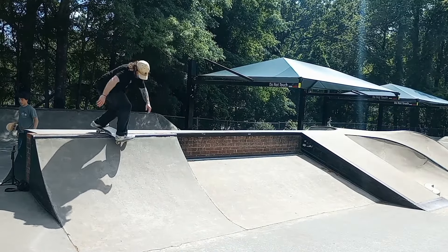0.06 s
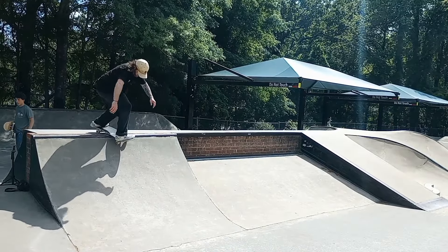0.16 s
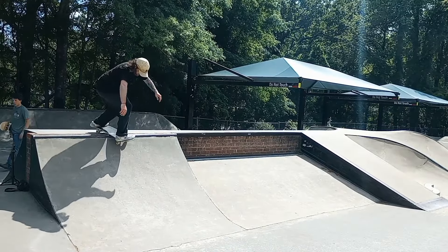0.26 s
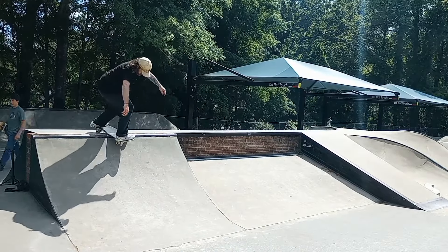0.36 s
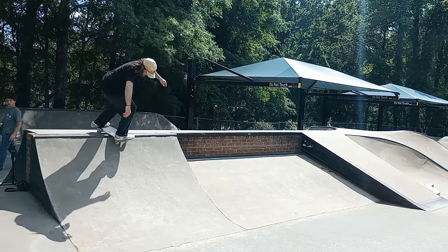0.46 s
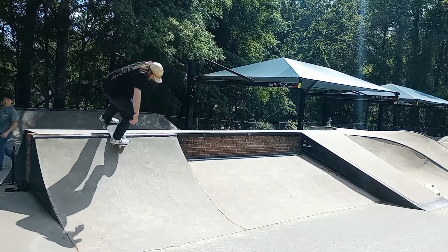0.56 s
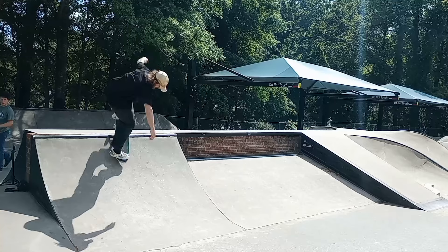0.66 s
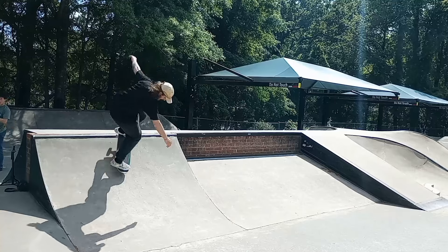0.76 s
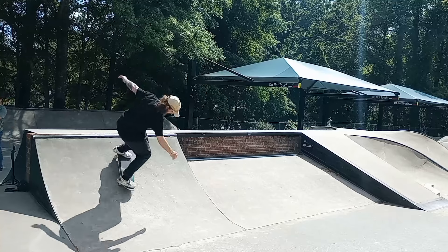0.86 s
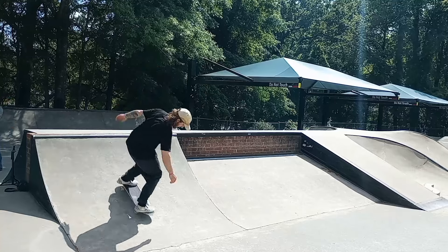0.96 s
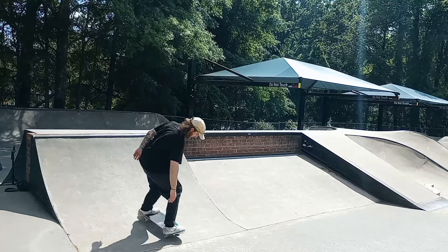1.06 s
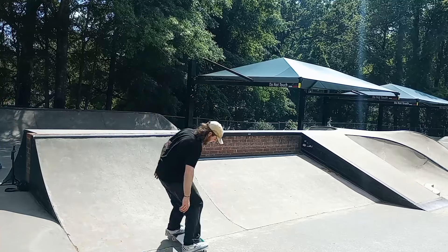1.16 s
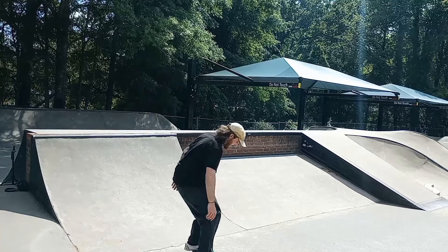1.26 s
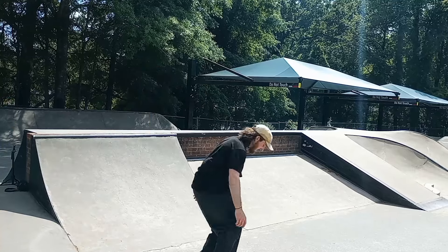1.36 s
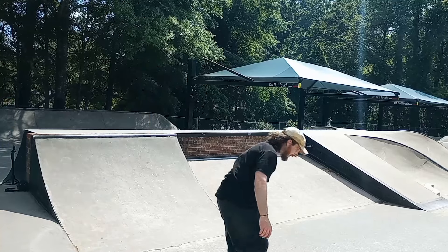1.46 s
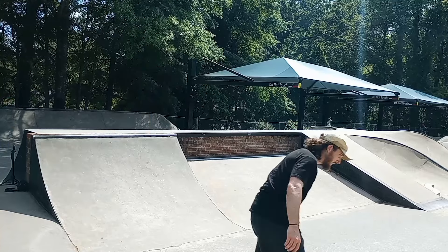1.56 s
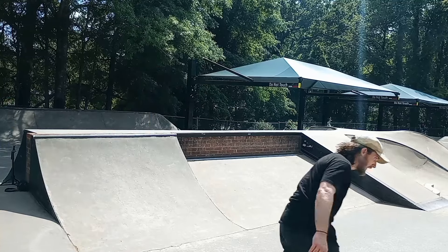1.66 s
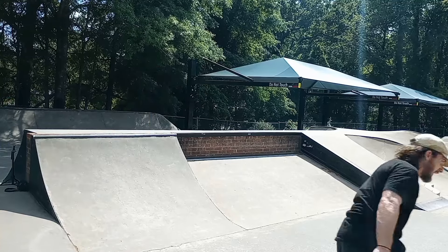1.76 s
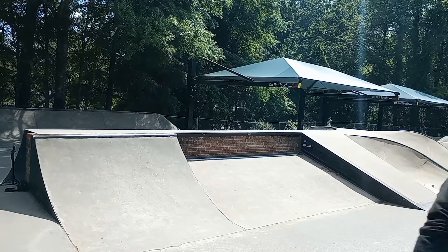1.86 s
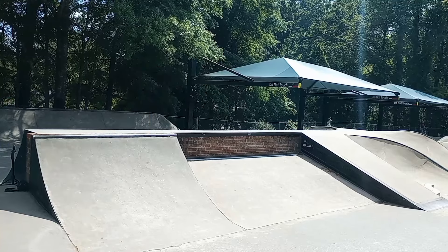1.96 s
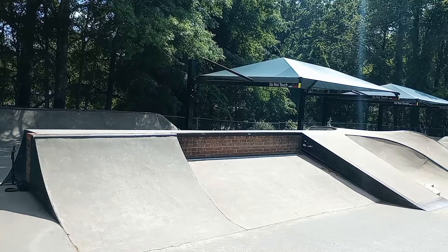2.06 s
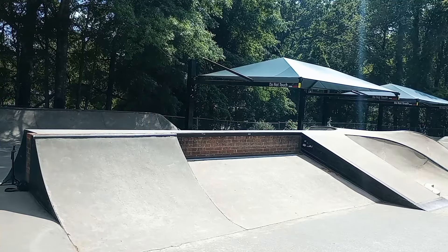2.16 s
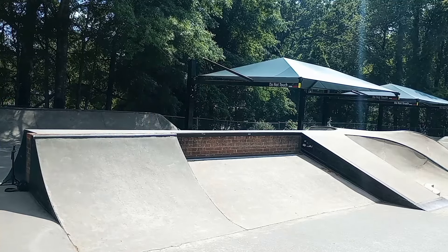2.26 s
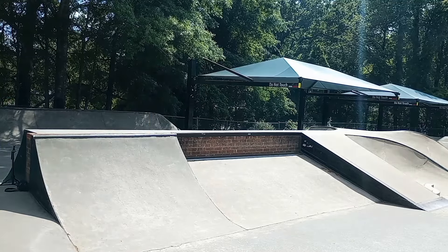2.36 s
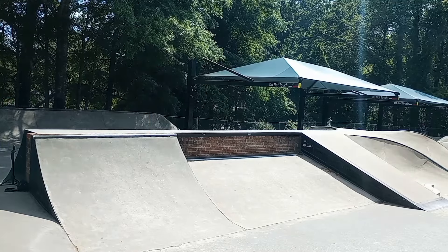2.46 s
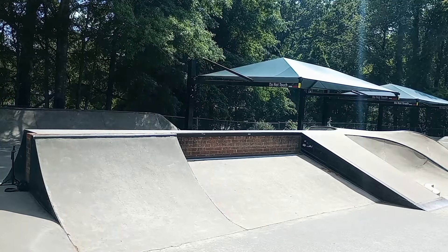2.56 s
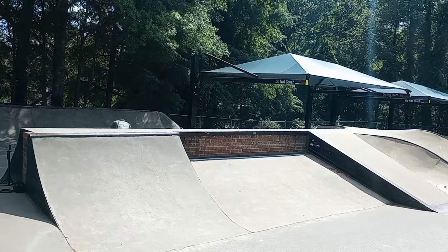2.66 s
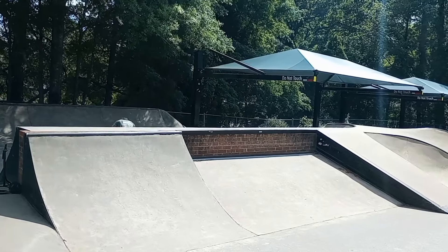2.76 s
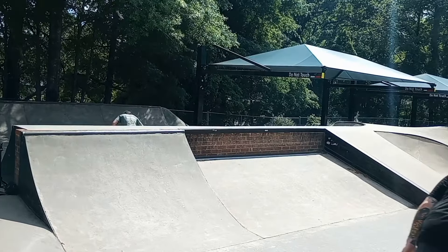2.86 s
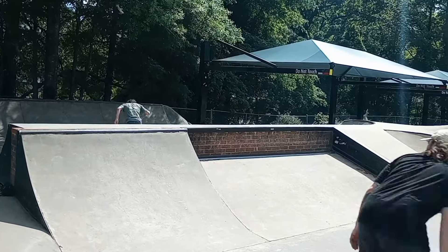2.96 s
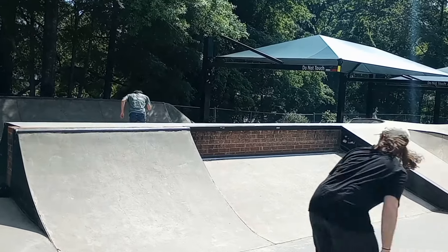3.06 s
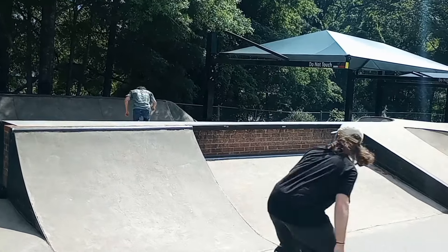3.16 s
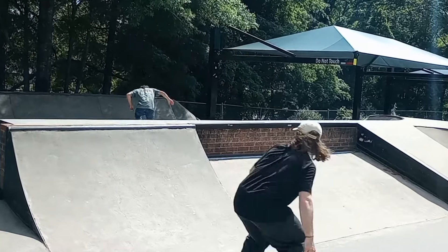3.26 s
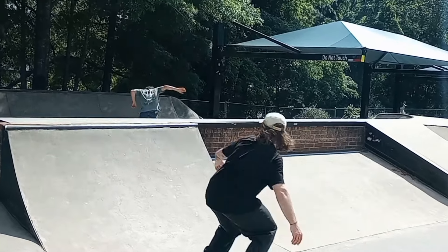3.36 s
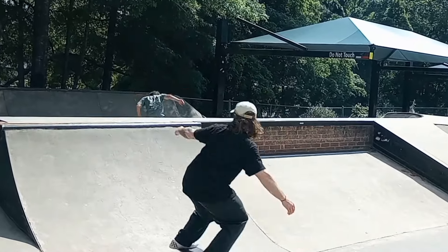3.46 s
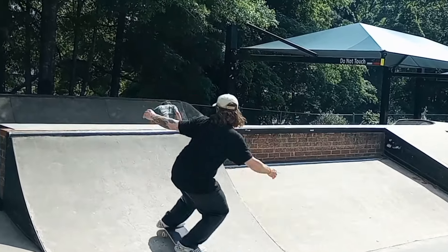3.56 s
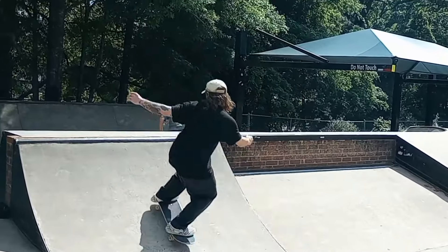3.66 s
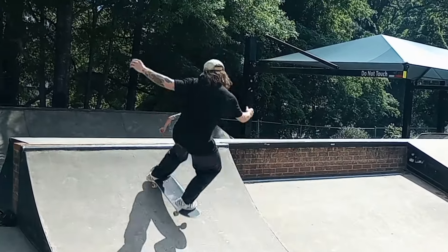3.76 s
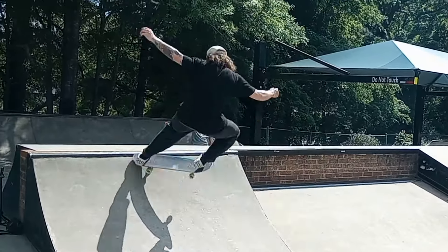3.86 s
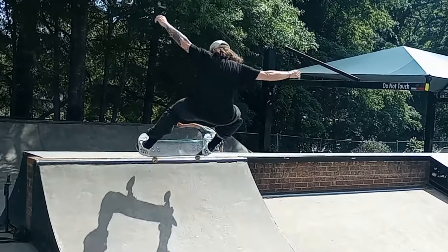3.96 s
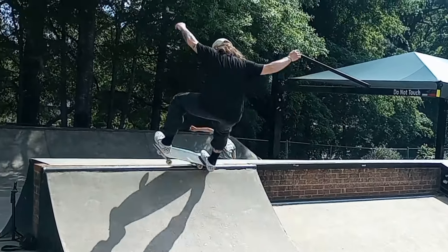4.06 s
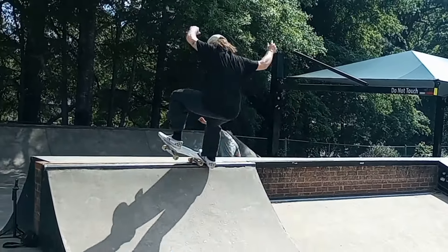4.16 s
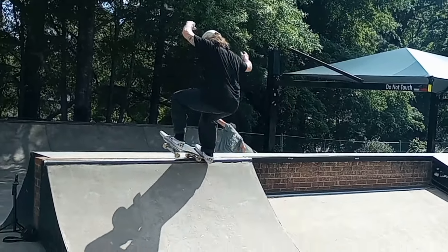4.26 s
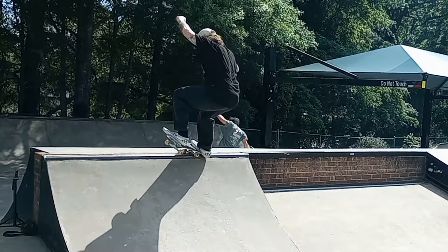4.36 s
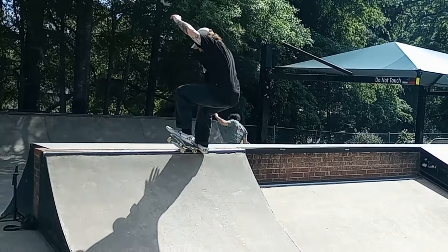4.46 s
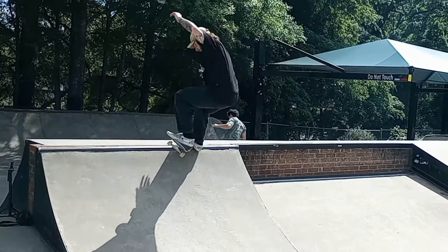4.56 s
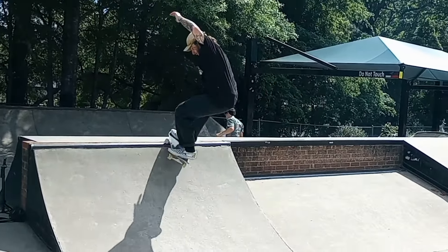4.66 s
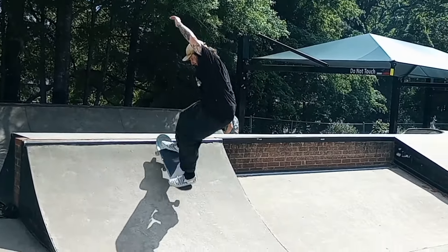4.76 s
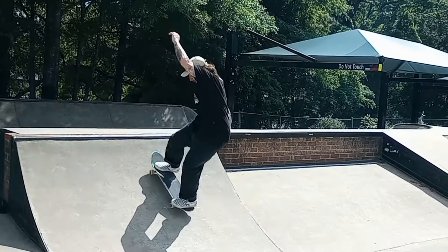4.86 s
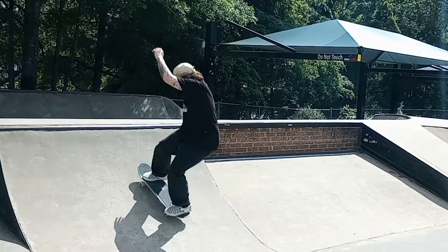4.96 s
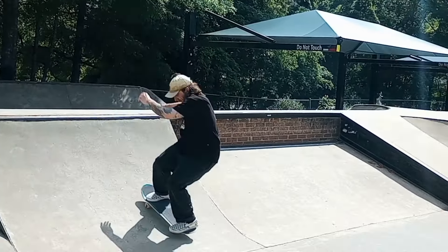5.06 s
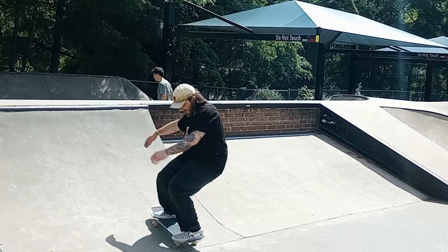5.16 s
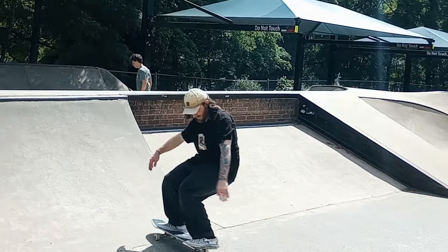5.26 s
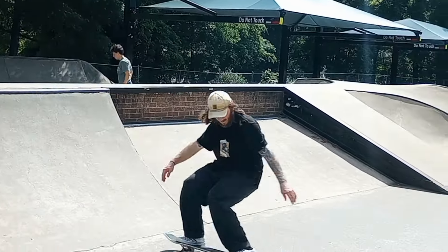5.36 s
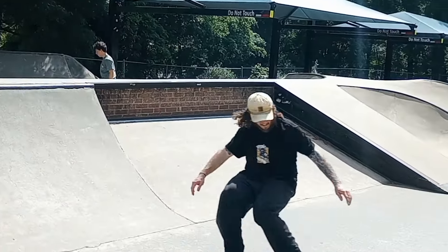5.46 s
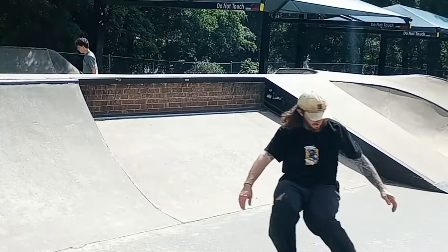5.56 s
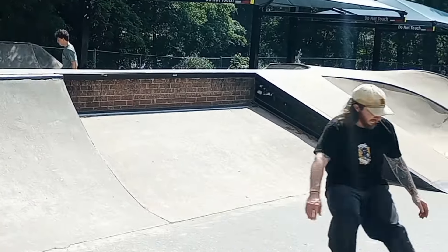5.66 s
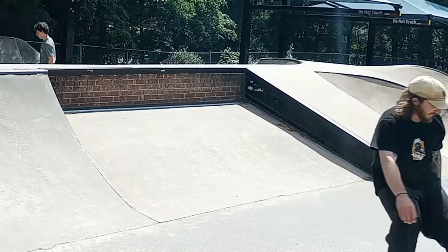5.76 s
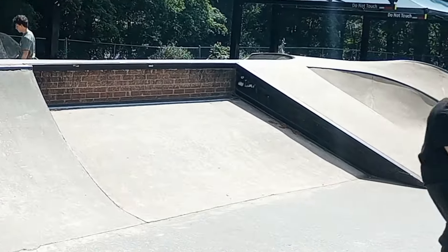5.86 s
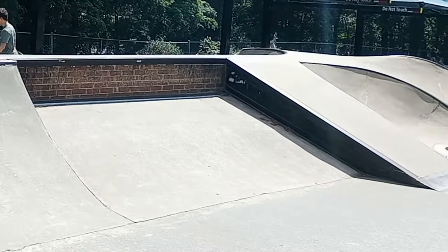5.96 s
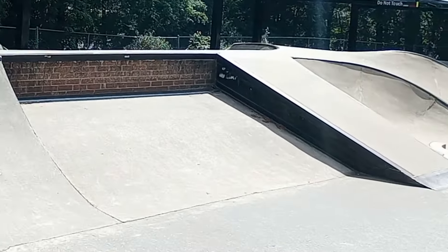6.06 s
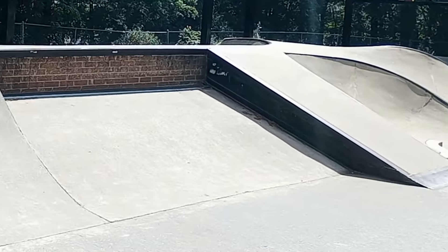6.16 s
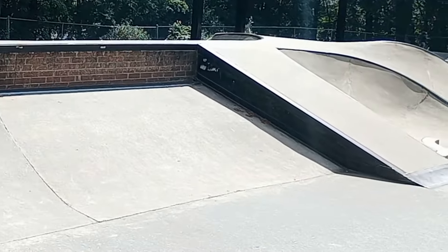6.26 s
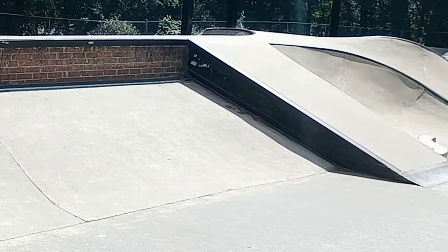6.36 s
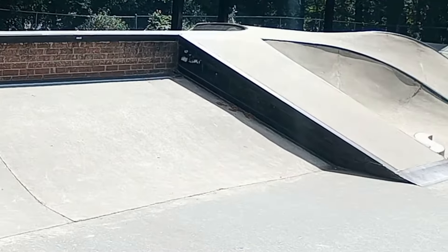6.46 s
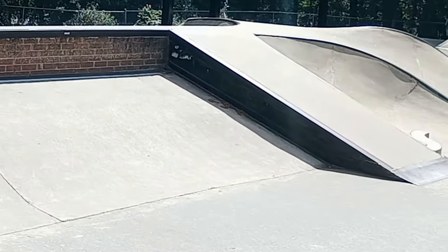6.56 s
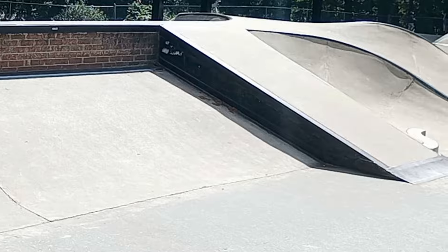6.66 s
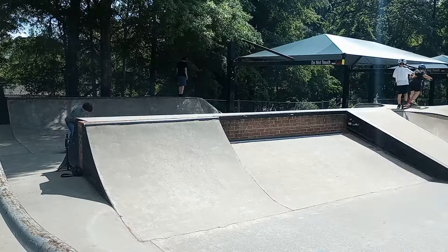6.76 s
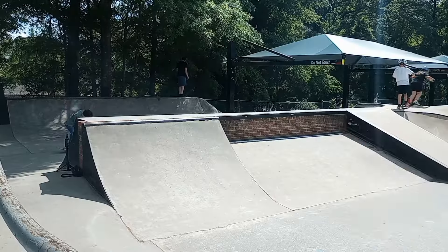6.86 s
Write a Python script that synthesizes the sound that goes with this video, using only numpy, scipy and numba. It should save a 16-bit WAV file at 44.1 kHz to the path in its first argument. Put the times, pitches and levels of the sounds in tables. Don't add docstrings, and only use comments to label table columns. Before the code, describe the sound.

Hard wheels rumble and hiss over gritty concrete, broken by sharp wood-and-steel clacks at a ramp's edge, ending in a sudden skid.

```python
import sys
import numpy as np
from scipy import signal
from scipy.fft import rfft, irfft
from scipy.io import wavfile
from scipy.ndimage import uniform_filter1d, map_coordinates
from numba import njit

SR = 44100
rng = np.random.default_rng(int(sys.argv[2]) if len(sys.argv) > 2 else 0)


def put_to_file(sound):
    columns = np.atleast_2d(sound).T
    safe = np.clip(columns, -1, 1)
    whole_steps = np.round(safe * 32767)
    wavfile.write(sys.argv[1], SR, whole_steps.astype(np.int16))


def decibels_to_gain(level_db):
    exponent = np.asarray(level_db, float) / 20
    return 10 ** exponent


N = 305172
T = np.arange(N) / SR

# frequency in Hz, density in dB per Hz.
PARK_SPECTRUM = [(15, -48), (30, -13.5), (123, 3.5), (277, -13), (326, -14), (607, -8), (1790, -15.5),
                 (2760, -12), (3520, -24.5), (4140, -19.5)]
PARK_SPECTRUM += [(8140, -34), (12100, -37), (13600, -41), (14900, -32), (15500, -33), (16500, -50)]
# frequency in Hz, correlation from 0 to 1.
PARK_LIKENESS = [(60, 0.98), (290, 0.91), (640, 0.27), (1400, 0.15), (16000, 0.022)]
# time in seconds, level in dB, width in seconds.
GUSTS = [
    (.83, -51, 0.018),
    (1.22, -57, 0.038),
    (1.55, -58, 0.12),
    (2.3, -62, 0.12),
    (2.45, -60, 0.046),
    (3.1, -49.5, 0.043),
    (3.9, -59, 0.076),
    (4.67, -53, 0.063),
    (6.2, -59, 0.04),
]
# time in seconds, width in seconds.
DIPS = [
    (2.552, 0.004),
    (6.656, 0.0028),
]
# time in seconds, lag in milliseconds.
PORT_LAG_MS = [(0, 0.093), (.7, -0.21), (1.2, -0.075), (1.75, -0.022), (2.3, 0.34), (2.6, 0.29),
               (3.2, -0.0049), (3.8, -0.16), (4.8, -0.14), (5.3, -0.076), (6.3, 0.088), (6.65, 0.084),
               (6.7, 0.27), (6.92, 0.31)]
# time in seconds, left minus right in dB.
ROLL_PAN_DB = [(0.0, -8), (0.42, -6), (0.46, 0.5), (1.56, 2.5), (2.37, -4.5), (3.1, 6.5), (4.49, -3),
               (4.61, 3), (4.72, 2.5), (6.63, -1), (6.73, -4), (6.92, -2.5)]
# middle in seconds, half length in seconds, resonance in Hz,
# its width in Hz, level in dB.
SCUFFS = [(0.447, .02, 2660, 700, -61), (0.765, 0.027, 2550, 520, -48), (.765, .025, 1900, 420, -50),
          (2.25, 0.05, 1450, 200, -47), (3.39, 0.05, 3500, 2400, -58), (3.38, .035, 2200, 300, -62),
          (3.24, .06, 2650, 1200, -62), (3.03, .035, 6200, 2000, -50), (3.03, .03, 4000, 1000, -54),
          (1.03, .13, 6050, 1300, -48), (1.95, .07, 5500, 1200, -52), (3.742, .012, 2000, 700, -51),
          (4.29, 0.018, 2500, 2200, -53), (4.275, .03, 1500, 600, -56), (1.74, .07, 5600, 2600, -54),
          (4.17, .03, 4200, 900, -52), (4.185, .015, 600, 900, -50), (4.245, .015, 4200, 2000, -58),
          (5.48, .16, 400, 260, -42), (6.35, .03, 1660, 200, -60), (1.42, .17, 160, 380, -54),
          (2.075, .055, 4400, 3600, -43), (2.25, .1, 4400, 700, -58), (5.52, 0.19, 5900, 1340, -57),
          (6.3, 0.03, 3600, 2400, -58), (6.595, .04, 720, 300, -48), (3.72, .08, 880, 500, -47),
          (5.53, .07, 1620, 300, -50), (5.8, .08, 1150, 500, -57), (6.47, .025, 850, 300, -53),
          (6.39, .03, 970, 250, -56), (4.66, .045, 880, 600, -54), (3.568, 0.065, 1004, 397, -42),
          (5.47, .025, 1030, 300, -48), (6.344, 0.02, 2090, 1300, -58), (3.89, .04, 2200, 800, -59),
          (5.91, .06, 2050, 900, -63), (1.8, .17, 1500, 1500, -48), (6.795, .025, 8010, 250, -57),
          (2.345, .04, 1420, 110, -46.5), ]
# peak in seconds, level in dB, rise in seconds,
# fall in seconds, fineness in dB.
SKIDS = [
    (.42, -61.5, 0.12, 1, -15),
    (0.777, -40, 0.038, 0.011, -21),
    (2.031, -36, 0.018, 0.1, 0.5),
    (4.68, -51.5, 0.032, 0.099, -13),
    (6.666, -40, .006, 0.12, -16),
    (6.773, -34, 0.013, 0.54, -10),
]
# time in seconds, level in dB, left minus right in dB.
PEBBLES = [(0.722, -45, -17), (.938, -34, 8), (1.149, -27.5, 8), (1.39, -42, 1), (1.438, -33, 10),
           (1.491, -41, -2), (1.612, -29.5, -4), (1.6877, -33, -1), (1.7182, -30, -4), (1.8917, -40, 0),
           (4.196, -52, 0), (2.573, -39, 8.5), (2.7535, -35, 8), (2.879, -34.5, 9), (3.002, -35, 5),
           (3.514, -30, 5), (1.471, -30.5, 4), (1.518, -36, 9), (1.5445, -52, 0), (1.635, -27, 3),
           (2.121, -32, -7), (2.264, -39.5, -16), (2.2945, -39, -15), (3.7497, -32.5, 12),
           (4.2737, -64, -15), (6.2955, -44, 9), (6.3435, -54, -3), (3.399, -59, -13), (6.771, -18, -12.5)]
# frequency in Hz, width in Hz, level in dB.
STEEL_MODES = [(2200, 2200, -4), (3900, 2400, -13), (6050, 2400, -12)]
# time in seconds, thud in dB, ring in Hz, crack in dB,
# left minus right of the crack in dB.
SLAMS = [(0.581, -25, 987, -30.5, 12), (0.5838, -18, 342, -15.5, 4.5), (.584, -35, 1740, -49, 2),
         (0.603, -34, 820, -33, -5), (.8152, -0.5, 795, -24, 12), (0.8208, 3.5, 798, -16, 6),
         (.8205, -7.5, 1530, -40, 0), (0.8195, -11, 2360, -43, 0), (.8245, -29, 700, -57, 2),
         (.830, -24, 655, -35, 0), (4.073, -26.5, 815, -17, 9.5), (4.08, -17.5, 812, -10.5, -10.5),
         (4.079, -23, 2300, -47, -3), (4.1155, 2, 2300, -45, 0), (4.098, -29, 960, -22, 3),
         (4.11, -18.5, 323, -25, 11), (4.116, -35.5, 594, -17, 2), (4.172, -49, 393, -41, -18),
         (4.218, -61, 905, -45, -2), (4.618, -54, 875, -42, 5), (4.62, -45, 2120, -62, -2),
         (4.692, -26.5, 238, -29, 14), (4.694, -28.5, 1484, -40, -13), (4.703, -55, 854, -51, -21),
         (4.828, -17.5, 983, -19, -1), (4.840, -31, 720, -13, -2), (4.844, 4.5, 740, -29, 10),
         (4.849, -21, 790, -23, 22), (4.853, -8, 726, -18, -1), (4.857, -8, 690, -27, -6),
         (4.861, -40, 720, -22.5, -3), (4.866, -9, 730, -24, -1), (4.872, -17, 294, -31, 15)]
# time in seconds, thud in dB, ring in Hz, crack in dB.
JOINTS = [(0.495, -54, 200, -43), (0.905, -25, 307, -35), (1.155, -29, 456, -54), (1.214, -25.5, 610, -62),
          (1.224, -17.5, 323, -40), (1.225, -34, 775, -43), (1.225, -28, 1426, -50), (1.613, -34, 380, -35),
          (1.713, -48, 770, -40), (2.659, -18, 580, -32.5), (2.725, -22, 577, -42), (2.767, -44, 570, -45),
          (3.433, -24, 211, -36.5), (3.443, -40, 580, -33.5), (3.453, -15.5, 684, -34),
          (3.652, -20.5, 547, -55), (5.029, -29, 332, -36), (5.207, -20.5, 270, -46),
          (5.21, -32.5, 765, -58), (5.293, -21.5, 775, -31), (5.295, -27, 248, -60), (6.451, -53, 812, -52),
          (6.548, -42, 730, -60), (6.657, -28, 1820, -37), (6.664, -37, 654, -38)]
# time in seconds,
# thud in dB, ring in Hz.
JOLTS = [(0.895, -17, 323), (0.93, -12, 300), (0.968, -20, 573), (1.015, -13, 280), (1.36, -50, 1100),
         (1.435, -35, 1032), (1.586, -34, 710), (1.685, -30.5, 374), (1.745, -16, 780), (1.79, -21, 590),
         (1.897, -23, 402), (1.913, -17, 468), (1.973, -12.5, 647), (2.007, -30, 660), (2.036, -21, 690),
         (2.14, -23, 610), (2.26, -31.5, 880), (2.693, -18, 584), (2.744, -8.5, 546), (2.865, -32, 589),
         (3.002, -23.5, 698), (3.066, -27, 773), (3.155, -42, 620), (3.305, -33, 642), (3.348, -42, 637),
         (3.399, -37, 256), (3.512, -20.5, 550), (4.953, -30, 370), (4.981, -26, 347), (5.356, -24, 574),
         (5.47, -25, 630), (5.541, -23.5, 414), (5.577, -29, 630), (5.627, -36, 457), (5.702, -45, 314),
         (5.777, -34, 363), (6.272, -47, 492), (6.416, -45, 550), (6.574, -49, 730), (6.829, -43, 490),
         (6.856, -24.5, 580), (6.897, -27, 550),
         (.5893, -18, 350), (.587, -33, 1015), (.591, -27, 1720), (.626, -47, 350), (.8215, -8, 3850),
            (.833, -21, 278), (1.62, -35, 163), (1.708, -26, 159), (1.714, -28, 1200), (1.764, -30, 764),
            (1.797, -21, 164), (1.807, -19, 610), (1.819, -9.5, 660), (1.845, -33, 375), (1.922, -31, 159),
            (2.053, -16.5, 690), (2.162, -28, 560), (2.205, -43, 149), (2.232, -41, 880),
            (4.081, -14, 5900), (4.112, -19, 866), (4.117, -19, 6000), (4.2745, -32, 2640),
            (4.298, -51, 2630), (5.051, -24, 320), (5.07, -25, 322), (5.035, -33, 810), (5.155, -39, 580),
            (5.41, -21, 647), (6.551, -50, 770), (.797, -45, 750), (4.074, -24, 2040), (4.076, -26, 3580),
            (6.658, -34, 1486), (6.770, -21, 3320), (6.772, -36, 1780), (4.694, -41, 400),
            (4.842, -8, 1100), (4.845, -17, 428), (4.0833, -34, 1510), (4.118, -18, 2930)]
# frequency in Hz, density in dB per Hz.
GRIT_SPECTRUM = [(1350, -20), (2300, -6.5), (2660, -7), (3310, -2), (4770, -5.5), (5570, -3), (6040, -3),
                 (6880, -6)]
GRIT_SPECTRUM += [(7600, -5), (10000, -4), (12800, -8), (13500, -7), (15100, 3), (15500, 2), (16500, -20)]
# start in seconds, wheel ring in Hz, its glide in Hz per second,
# deck ring in Hz, truck ring in Hz.
SURFACES = [(0, 670, 50, 198, 1590), (.85, 639, -44, 318, 1018), (1.3, 980, -150, 410, 1120),
            (1.6, 738, -200, 369, 1166), (1.841, 450, 1400, 330, 1190), (2.019, 622, 128, 306, 1230),
            (2.555, 640, -280, 323, 1555), (2.869, 672, -77, 293, 840), (3.45, 596, -5, 278, 890),
            (4.0, 840, 8, 280, 1520), (4.88, 760, -600, 393, 1164), (5.2, 610, 0, 302, 890),
            (5.28, 664, -640, 346, 1574), (5.95, 520, 100, 247, 1220), (6.25, 565, 699, 279, 1260),
            (6.66, 580, 0, 298, 1720)]
# time in seconds, wheel level in dB, then deck flex and grit in dB against the wheels.
DROP_IN = [(.5, -75.5, 10, 8), (.84, -58, -10, -20), (.852, -52, 6, -9), (0.916, -33, -4, -10),
           (1.024, -30.5, 2.5, -6.5), (1.268, -46.5, 2, -1), (1.388, -52.5, -9.5, 7)]
PASS_BY = [(1.589, -45.5, -6.5, 0.5), (1.64, -37.5, 1, -4.5), (1.802, -29, -11.5, -15.5),
           (1.854, -32, -5, -15), (2.015, -32, -20, -20.5), (2.097, -36, -8, -13),
           (2.231, -40.5, -15.5, -12.5), (2.335, -55, -1, 2), (2.545, -69.5, 10, 7)]
RETURN = [(2.555, -51, -24, -16), (2.574, -30, -26, -18.5), (2.725, -34.5, -17, -13),
          (2.819, -34, -14.5, -10.5), (2.929, -36, -7, -9), (3.12, -43.5, -16.5, -4),
          (3.17, -47.5, -1.5, -9.5), (3.291, -53.5, 0, -3.5), (3.421, -46.5, -8, -8)]
CLIMB = [
    (3.48, -41.5, -9, -4),
    (3.568, -40.5, 4.5, -3),
    (3.63, -42, 6.5, -3),
    (3.956, -64.5, -8, 6.5),
]
STALL = [
    (4.068, -68, 7, 6),
    (4.087, -39.5, -1, 0),
    (4.176, -68.5, 3, 19.5),
    (4.332, -96, 26, 25.5),
    (4.66, -68, -5, 5.5),
    (4.801, -78, -1, 6),
]
ROLL_OFF = [(4.867, -32.5, 7.5, -2.5), (4.895, -42.5, -1, -4), (5.057, -44, 5, -3.5), (5.149, -51.5, -7, 2),
            (5.19, -59, 3, 9), (5.23, -46.5, 3, -1.5), (5.28, -48.5, 7.5, 0.5), (5.31, -42, -2.5, -5.5),
            (5.43, -33, -23, -16), (5.572, -41.5, -13, -9), (5.735, -42.5, -0.5, -16.5),
            (5.91, -48, -1.5, -14.5), (5.95, -59.5, -0.5, -3)]
FAR_BOARD = [(6.24, -62.5, -2, -4.5), (6.303, -53.5, -3, -2), (6.39, -64.5, 2, -1), (6.43, -56, -4.5, -6),
             (6.51, -57.5, -4, -10), (6.56, -57.5, 6.5, -1.5), (6.652, -63.5, 1.5, 4.5)]
NEXT_RIDER = [
    (6.719, -53, -8, -9),
    (6.776, -61.5, -2, -27),
    (6.826, -45, -13.5, -29),
    (6.92, -32, -8.5, -53),
]


def level(x, db=0):
    return x * decibels_to_gain(db) / np.sqrt(np.mean(x ** 2))


@njit
def bandpass(x, g, k):
    y, band, low = np.empty(len(x)), 0., 0.
    for i in range(len(x)):
        v = (band + g[i] * (x[i] - low)) / (1 + g[i] * (g[i] + k[i]))
        band = 2 * v - band
        low = low + 2 * g[i] * v
        y[i] = k[i] * v
    return y


def ring(x, hz, width_hz):
    hz = np.clip(hz * np.ones(len(x)), 40, SR / 2.5)
    g, k = np.tan(np.pi * hz / SR), width_hz / hz
    for _ in range(5):
        x = bandpass(x, g, k)
    return level(x)


def colour(x, points, gain=decibels_to_gain):
    hz, value = np.transpose(points)
    f = np.maximum(np.arange(N // 2 + 1) * SR / N, 1)
    return irfft(rfft(x) * gain(np.interp(np.log(f), np.log(hz), value)), N)


def split(x, edges_hz):
    bands = []
    for k, pair in enumerate(zip(edges_hz, edges_hz[1:])):
        sos = signal.butter(2, pair, "band", fs=SR, output="sos")
        bands.append((-1) ** k * signal.sosfilt(sos, x))
    return bands


def walk(rate_hz):
    k = int(SR / rate_hz)
    path = np.repeat(rng.standard_normal(500)[:N // k + 1], k)[:N]
    path = uniform_filter1d(uniform_filter1d(path, k), k)
    return path / np.std(path)


def bumps(rate_hz, spread_db):
    met = rng.random(N) < rate_hz / SR
    return met * rng.standard_normal(N) * decibels_to_gain(spread_db * rng.exponential(size=N)) + 1e-18


def pan(x, db):
    return x * decibels_to_gain(np.array([db, -db]).reshape(2, -1) / 2)


def park():
    mid, side = (colour(rng.standard_normal(N), PARK_SPECTRUM) for _ in range(2))
    mid = colour(mid, PARK_LIKENESS, lambda c: np.sqrt(1 + np.clip(c, 0, 1)))
    side = colour(side, PARK_LIKENESS, lambda c: np.sqrt(1 - np.clip(c, 0, 1)))
    steady = 0
    for k, band in enumerate(split([mid + side, mid - side], np.geomspace(20, 18000, 21))):
        swell_db = 1.2 + 1.4 * (k < 7)
        steady = steady + band * decibels_to_gain(.9 * walk(25) + swell_db * walk(5))
    steady = decibels_to_gain(.6 * walk(1.5)) * steady
    gust_gain = sum(decibels_to_gain(db) * np.exp(-((T - s) / width_s) ** 2) for s, db, width_s in GUSTS)
    wind = ring(rng.standard_normal(N), 64, width_hz=120) * gust_gain
    return level(steady, -56.5) + wind


def echoes(x, t60_s, db):
    t = np.arange(SR // 2) / SR
    tail = rng.standard_normal((2, len(t))) * np.exp(-np.log(1000) * t / t60_s) * (t > .002)
    tail = signal.sosfilt(signal.butter(1, 500, "high", fs=SR, output="sos"), tail)
    tail = decibels_to_gain(db) * tail / np.sqrt(np.sum(tail ** 2, axis=1, keepdims=True))
    return signal.fftconvolve(x, tail, axes=1)[:, :N]


def ports(x):
    half_lag = np.interp(T, *np.transpose(PORT_LAG_MS)) * SR / 2000
    left = map_coordinates(x[0], [np.arange(N) - half_lag], order=3)
    right = map_coordinates(x[1], [np.arange(N) + half_lag], order=3)
    return np.array([left, right])


def scuffs():
    grains, out = bumps(rate_hz=5000, spread_db=3.0), np.zeros(N)
    for s, half_s, hz, width_hz, db in SCUFFS:
        near = slice(int((s - 2 * half_s) * SR), int((s + 2 * half_s) * SR))
        swell = np.exp(-((T[near] - s) / half_s) ** 4)
        out[near] += decibels_to_gain(db) * swell * ring(grains[near], hz, width_hz)
    return out


def cracks():
    out, t = np.zeros((2, N + SR)), np.arange(SR // 5) / SR
    noise = colour(bumps(rate_hz=9500, spread_db=0.0), [(300, -62), (1400, 0.0)] + GRIT_SPECTRUM[1:])
    body, top, air = (level(band) for band in split(noise, [1000, 6800, 12500, 17000]))
    body = level(body + sum(decibels_to_gain(db) * ring(noise, hz, width_hz) for hz, width_hz, db in STEEL_MODES))
    body, top = np.tile(body, 2), np.tile(decibels_to_gain(-14) * top + decibels_to_gain(-9.5) * air, 2)
    pebble = decibels_to_gain(-6.5) * body + decibels_to_gain(-3.5) * np.tile(ring(noise, 5420, width_hz=7300), 2)
    joint_pan_db, lead_s = 1.5, 0.0011
    blows = SLAMS + [(*row, joint_pan_db) for row in JOINTS]
    bursts = [(s - lead_s, db, side_db, body) for s, _, _, db, side_db in blows]
    bursts += [(*row, pebble) for row in PEBBLES]
    rise = 1 - np.exp(-t / .0014)
    fade = rise * (np.exp(-np.log(1000) * t / .015) + decibels_to_gain(-10.5) * np.exp(-t / 0.0038))
    for s, db, side_db, main in bursts:
        i = int(s * SR)
        burst = main[i:i + len(t)] + top[i:i + len(t)]
        out[:, i:i + len(t)] += pan(decibels_to_gain(db - 4.0) * fade * burst, np.clip(side_db, -13, 9))
    return out[:, :N]


def knocks():
    out, t = np.zeros(N + SR), np.arange(SR // 5) / SR
    clatter = np.tile(ring(bumps(rate_hz=1800, spread_db=1.5), 1630, width_hz=3600), 2)
    lump_db, lump_crack_db, clatter_db = -4, -44, -12
    blows = SLAMS + JOINTS
    blows = blows + [(s, db + lump_db, hz, db + lump_crack_db) for s, db, hz in JOLTS]
    turns = np.resize(rng.random(300), (len(blows), 3))
    push = (1 - np.exp(-t / .0013)) ** 2

    def mode(hz, turn):
        return np.sin(2 * np.pi * (hz * t + turn))

    for (s, db, hz, crack_db, *_), (a, b, c) in zip(blows, turns):
        ring_s = .027 * decibels_to_gain(-.36 * (db + 22.0)) / max(hz / 900, 1) ** .9
        fade = np.exp(-np.log(1000) * t / ring_s)
        body = mode(hz, 0)
        body = body + 0.12 * mode((0.44 + 0.022 * c) * hz, a)
        body = body + 0.25 * mode((1.075 + 0.225 * a) * hz, b)
        body = body + 0.045 * mode((1.8 + 0.29 * b) * hz, c)
        i = int(s * SR)
        body = body + decibels_to_gain(crack_db + clatter_db - db) * clatter[i:i + len(t)]
        out[i:i + len(t)] += decibels_to_gain(db + 5.0) * push * fade * body
    return signal.sosfilt(signal.butter(2, 190, "high", fs=SR, output="sos"), out[:N])


def skids():
    gain, weighted_fine = 0, 0
    for s, db, rise_s, fall_s, fine_db in SKIDS:
        slope = np.where(T < s, (s - T) / rise_s, (T - s) / fall_s)
        one = decibels_to_gain(db - 20 * slope)
        gain, weighted_fine = gain + one, weighted_fine + one * fine_db
    return gain, weighted_fine


def grit(fine_db):
    shared, left, right = (colour(bumps(rate_hz=12000, spread_db=1.0), GRIT_SPECTRUM) for _ in range(3))
    edges_hz = np.geomspace(1800, 17000, 33)
    hiss = 0
    for lo_hz, band in zip(edges_hz, split([shared + 1.72 * left, shared + 2.19 * right], edges_hz)):
        flicker_db = 2.2 * walk(30) + (3.0 - 1.6 * (lo_hz > 7000)) * walk(11)
        hiss = hiss + band * decibels_to_gain(flicker_db + fine_db * np.clip(lo_hz / 2000 - 3, 0, 1))
    jolts = walk(60)
    rattle = decibels_to_gain(1.5 * jolts + 1.8 * np.resize(jolts[::3], N) - .3)
    return hiss * rattle / np.std(shared) / 2.75


def rolling():
    passes = DROP_IN + PASS_BY + RETURN + CLIMB + STALL + ROLL_OFF + FAR_BOARD + NEXT_RIDER
    s, *columns = np.transpose(passes)
    ring_db, flex_db, grit_db = (np.interp(T, s, c) for c in columns)

    surfaces = np.array(SURFACES)
    start_s, hz, glide, deck_hz, truck_hz = surfaces[np.searchsorted(surfaces[1:, 0], T)].T
    shift_hz = glide * (T - start_s)
    tracks_hz = [hz + shift_hz, deck_hz * (1 + shift_hz / hz), truck_hz + .8 * shift_hz]
    wheel_hz, boom_hz, buzz_hz = uniform_filter1d(tracks_hz, size=3000)

    skid, skid_fine = skids()
    roll_hiss = decibels_to_gain(ring_db + grit_db)
    hiss = roll_hiss + skid
    buzz = decibels_to_gain(ring_db + 0.67 * grit_db - 5) + decibels_to_gain(-14) * skid
    roll_fine_db = -4.5 + .5 * np.maximum(ring_db + grit_db + 40.0, -6)
    fine_db = (roll_fine_db * roll_hiss + skid_fine) / hiss

    kicks = bumps(rate_hz=2400, spread_db=0.9)
    wheels = ring(kicks, (1 + .055 * walk(40)) * wheel_hz, width_hz=491)
    far_axle = decibels_to_gain(-9.0) * ring(bumps(rate_hz=3800, spread_db=4.0), 0.93 * wheel_hz, width_hz=570)
    deck = ring(kicks, boom_hz * (1 + .11 * walk(10)), width_hz=400)
    slab = decibels_to_gain(-15.0) * ring(bumps(rate_hz=760, spread_db=-2.5), 146.0, width_hz=191)
    low = wheels + decibels_to_gain(0.18 * flex_db + 3.5) * slab + decibels_to_gain(flex_db) * deck
    low = low + far_axle * np.array([[1], [-1]])

    main, skirt = [], []
    for _ in range(2):
        kick = bumps(rate_hz=3600, spread_db=0.9)
        main.append(ring(kick, buzz_hz * (1 + 0.13 * walk(22)), width_hz=0.58 * buzz_hz))
    for _ in range(2):
        skirt.append(ring(bumps(rate_hz=1500, spread_db=-1.0), 1730, width_hz=1700))
    trucks = np.array(main) + decibels_to_gain(-9.0) * np.array(skirt)
    return decibels_to_gain(ring_db) * low + buzz * trucks + hiss * grit(fine_db)


def scene():
    side_db = np.interp(T, *np.transpose(ROLL_PAN_DB))
    hits = ports(pan(knocks() + scuffs(), side_db) + cracks())
    board = ports(pan(rolling(), side_db)) + hits
    near = echoes(hits, t60_s=.008, db=-5)
    far = echoes(board, t60_s=0.15, db=-11.5)
    return board + near + far + park()


def starved_bands(x, lo_hz, hi_hz, margin_db):
    f, _, z = signal.stft(x, SR, nperseg=2048, noverlap=1024)
    power = np.add.reduceat(np.abs(z).mean(0) ** 2, np.arange(0, len(f), 24), axis=0)
    power = np.repeat(power, 24, axis=0)[:len(f)]
    power = power / np.exp(.7 * np.log(power + 1e-18).mean(1, keepdims=True))
    usual = np.exp(uniform_filter1d(np.log(power + 1e-18), size=121, axis=0))
    treble = ((f > lo_hz) & (f < hi_hz))[:, None]
    starved = (power < usual * decibels_to_gain(-2 * margin_db)) & treble
    return signal.istft(z * np.where(starved, .03, 1), SR, nperseg=2048, noverlap=1024)[1][:, :N]


def low_pass(x):
    return signal.sosfilt(signal.butter(12, 16800, fs=SR, output="sos"), x)


def record(dry):
    mix = starved_bands(dry, lo_hz=7300, hi_hz=14200, margin_db=1.0)
    for s, width_s in DIPS:
        mix = mix * np.clip(np.abs(T - s) / width_s - .2, .03, 1)
    mix = signal.sosfilt(signal.ellip(7, .5, 38, 15500, fs=SR, output="sos"), mix)
    return low_pass(mix)


dry = scene()
out = record(dry)
put_to_file(out)
```